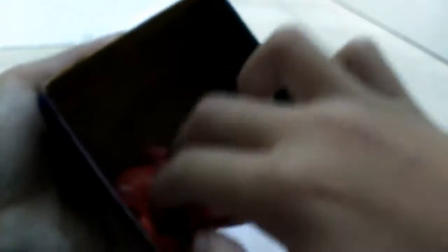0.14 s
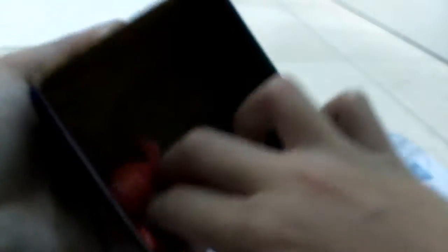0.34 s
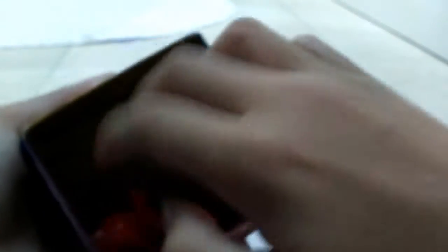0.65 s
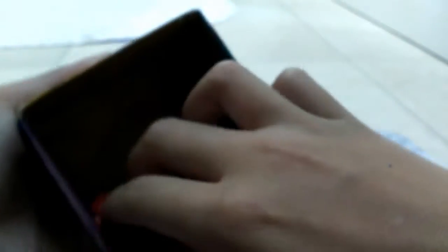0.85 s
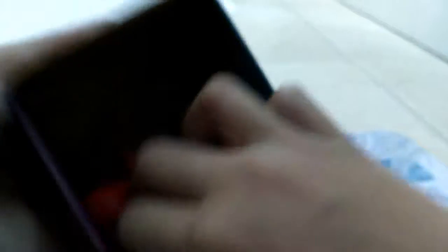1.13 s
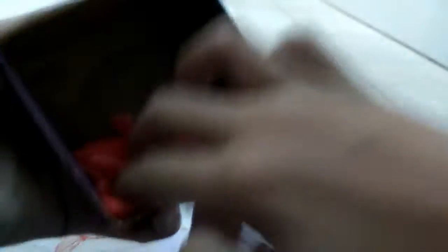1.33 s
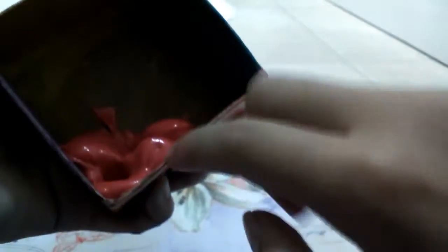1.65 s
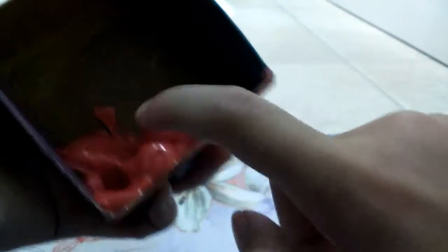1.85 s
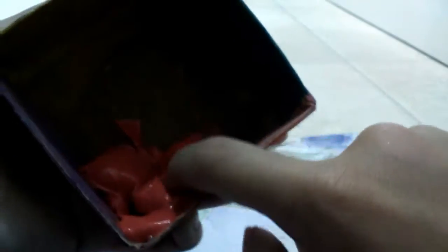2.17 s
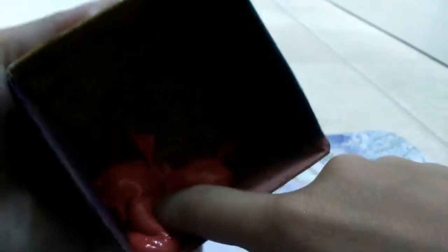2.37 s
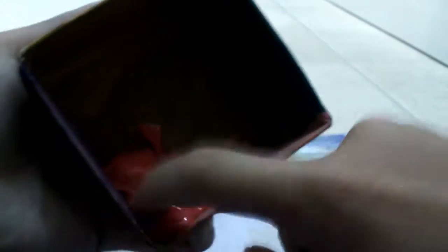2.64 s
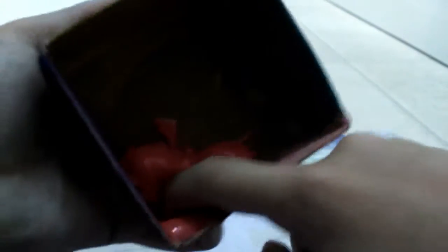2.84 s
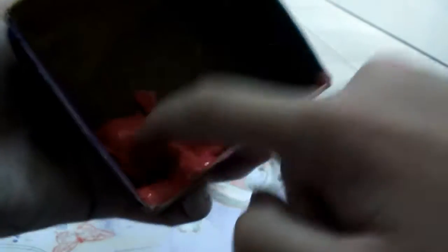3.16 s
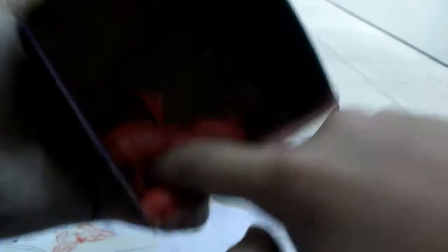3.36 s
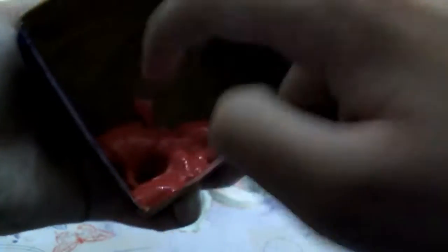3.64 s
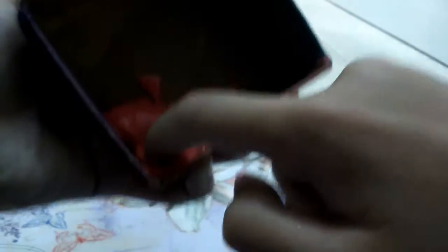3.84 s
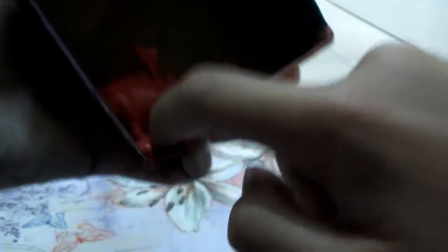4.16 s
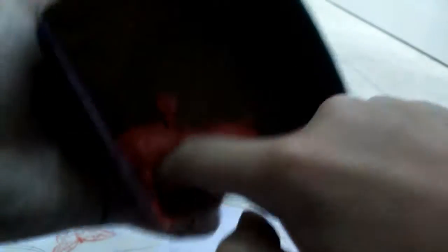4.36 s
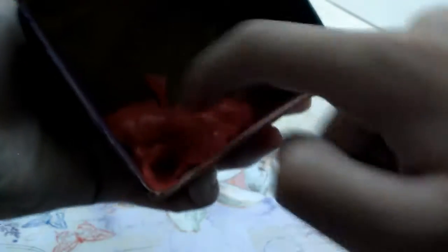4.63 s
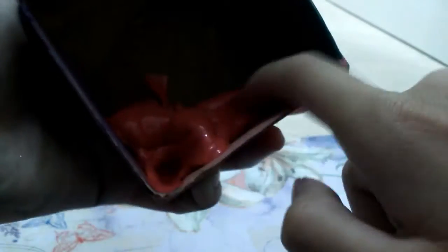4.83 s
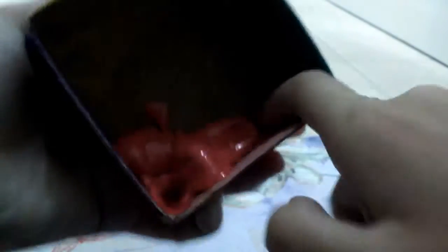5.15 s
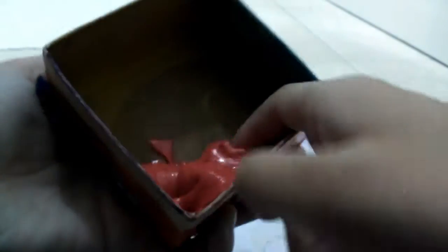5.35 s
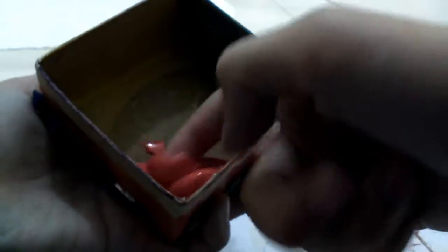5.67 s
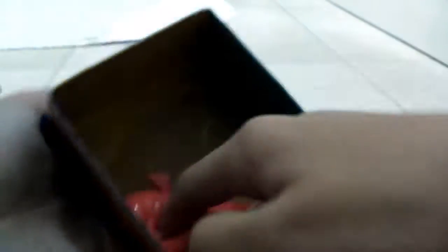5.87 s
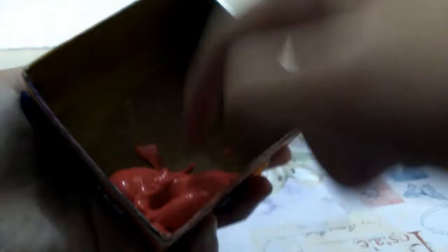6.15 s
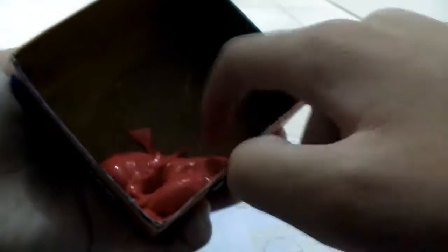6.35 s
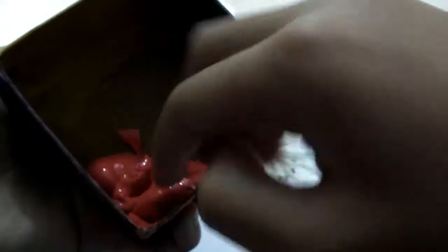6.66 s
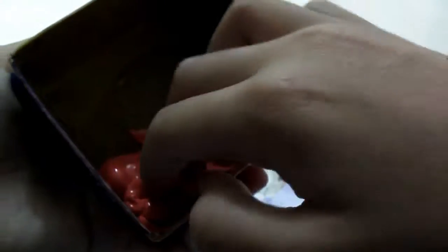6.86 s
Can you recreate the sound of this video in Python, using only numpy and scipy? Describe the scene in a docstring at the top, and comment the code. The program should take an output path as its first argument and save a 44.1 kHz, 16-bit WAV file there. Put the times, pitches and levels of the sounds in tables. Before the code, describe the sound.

Sticky slime is poked in a small hand-held box: brief boxy pops, tiny wet crackles and short skin squeaks at uneven intervals. One extremely loud, bright, dry snap occurs early, trailed by small even ticks. Soft thuds and low handling rumble come from the cardboard. The close microphone catches faint hiss and a short indoor reverberation; the later part is quieter until a final cluster of smacks.

```python
"""Fingers poke sticky slime in a small hand-held cardboard box, close to the microphone in a quiet room.
Air pockets pop and smack: torn-film noise and one click each ring a resonance coloured by the box.
Skin drags as random slips through gliding resonances; box bumps are decaying wall modes; dents rustle as noise.
One needle-sharp snap and then a run of small ticks are short rung impulses.
Noise gives a low handling rumble and a faint hiss; a decaying noise tail gives the room."""
import sys
import numpy as np
from scipy import signal
from scipy.fft import rfft
from scipy.io import wavfile

SR = 44100
rng = np.random.default_rng(int(sys.argv[2]) if len(sys.argv) > 2 else 0)


def persist_wave(psi):
    """Save psi, clipped to +-1, as 16-bit WAV."""
    counts = np.round(np.clip(psi, -1, 1) * 32767).astype(np.int16)
    wavfile.write(sys.argv[1], SR, np.atleast_2d(counts).T)


N = 308700  # samples, 7 s


def from_db(db):
    """Decibels to amplitude gain."""
    return 10 ** (np.asarray(db) / 20)


def rms_one(x):
    """Scale to rms 1."""
    return x / np.sqrt(np.mean(x ** 2) + 1e-20)


def add(track, start_s, sound):
    """Mix a sound into a track from start_s on."""
    start = max(0, round(start_s * SR))
    track[..., start:start + sound.shape[-1]] += sound[..., :N - start]


def lowpass(x, hz, order=2):
    """Butterworth low-pass."""
    return signal.sosfilt(signal.butter(order, min(hz, SR / 2 - 500), fs=SR, output="sos"), x)


def highpass(x, hz, order):
    """Butterworth high-pass."""
    return signal.sosfilt(signal.butter(order, hz, "high", fs=SR, output="sos"), x)


def resonance(x, hz, width_hz):
    """Two-pole resonance with gain 1 on top."""
    r = np.exp(-np.pi * width_hz / SR)
    zeros = np.array([1, 0, -1]) * (1 - r * r) / 2
    poles = [1, -2 * r * np.cos(2 * np.pi * hz / SR), r * r]
    return signal.lfilter(zeros, poles, x + 1e-18)


def peak_or_dip(x, hz, width_hz, level_db):
    """Bell filter: lifts or lowers a band by level_db at its centre."""
    half_width, lift = np.pi * width_hz / SR, from_db(level_db / 2)
    middle = -2 * np.cos(2 * np.pi * hz / SR)
    zeros = [1 + half_width * lift, middle, 1 - half_width * lift]
    poles = [1 + half_width / lift, middle, 1 - half_width / lift]
    return signal.lfilter(zeros, poles, x)


def coloured_noise(points):
    """Steady noise with the given spectrum, rms 1."""
    hz, level_db = np.transpose(points)
    bins_hz = np.fft.rfftfreq(N, 1 / SR) + 1  # +1 avoids log(0)
    gain = from_db(np.interp(np.log(bins_hz), np.log(hz), level_db))
    return rms_one(np.fft.irfft(rfft(rng.standard_normal(N)) * gain, N))


def drift(size, rate_hz):
    """Smooth random wavering, random knots of spread 1 joined by lines."""
    knots = np.arange(size) * rate_hz / SR
    return np.interp(knots, np.arange(4000), rng.standard_normal(4000))


def grains(size, per_s, spread_db):
    """Tiny releases: impulses at random moments with random sign and uneven strength, rms 1."""
    born = rng.random(size) < per_s / SR
    sign = rng.choice([-1, 1], size)
    strength = from_db(spread_db * np.minimum(rng.exponential(1, size), 4))
    return rms_one(born * sign * strength)


def chance_events(per_s, level_db, spread_db):
    """Faint events at random moments, level_db +/- spread_db: rows (time s, level dB)."""
    draws = rng.random((60, 2))
    times_s = np.cumsum(-np.log(1 - draws[:, 0])) / per_s
    levels_db = level_db + spread_db * (2 * draws[:, 1] - 1)
    return np.column_stack([times_s, levels_db])[times_s < N / SR]


def pocket(force, hz, width_hz):
    """Trapped air ringing around a pitch that may move; gain 1 on top."""
    turn = np.exp(2j * np.pi * np.cumsum(hz * np.ones(len(force))) / SR)
    return 2 * np.real(turn * lowpass(force / turn + 1e-18, width_hz / 2))


def pocket_width(hz, crack_db):
    """Small pockets and hard cracks ring more briefly: width of the resonance in Hz."""
    width_at_1khz_hz, pitch_power, doubling_db = 1634, 0.36, 23
    return width_at_1khz_hz * (hz / 1000) ** pitch_power * 2 ** (crack_db / doubling_db)


def in_box(x, hz, low_hz=400):
    """Small pockets reach higher into the treble. Gives (coloured by the open box, spilling into the room)."""
    # air in the open box, peaks and dips: (frequency [Hz], width [Hz], gain [dB])
    cavity = [(482, 120, 12.5), (600, 160, -12), (1009, 130, 10.5), (1477, 150, 11), (2144, 100, 5.5),
              (2522, 78.5, 6), (3471, 230, 9.5), (4492, 300, 11), (5360, 180, 4), (6350, 1100, 2.5)]
    top_at_1khz_hz, top_power = 6010, .16
    leak_at_1khz_db, leak_db_per_octave, spill_leak_db = -23, 6.5, -9.5
    khz = hz / 1000
    x = highpass(x, low_hz, order=2)
    body = lowpass(x, top_at_1khz_hz * khz ** top_power, order=8)
    leak = from_db(leak_at_1khz_db + leak_db_per_octave * np.log2(khz)) * x
    spill = body + from_db(spill_leak_db) * leak  # less of the highest treble reaches the room
    boxed = body + leak
    for mode_hz, width_hz, gain_db in cavity:
        boxed = peak_or_dip(boxed, mode_hz, width_hz, gain_db)
    return np.array([boxed, spill])


def background(lumps_db=3.5, handling_db=2, hiss_db=-75):
    """Uneven low rumble of the moving hands over a steady faint hiss."""
    # hands holding the box: (time [s], level before handling_db and lumps [dB])
    handling = [(0.0, -65.5), (0.35, -69.5), (0.7, -63), (0.97, -69), (1.75, -71.5), (3.84, -66.5),
                (4.5, -63), (5.01, -69.5), (5.899, -68), (6.41, -63), (6.65, -57.5), (7.0, -68.5)]
    # rumble spectrum: (frequency [Hz], relative level per Hz [dB])
    handling_colour = [(25, -6.5), (38, -7.5), (55, 4.5), (85, -4.5), (180, -10), (280, -12), (420, -20),
                       (600, -31)]
    # hiss spectrum: (frequency [Hz], relative level per Hz [dB])
    hiss_colour = [(400, 1), (590, -9.5), (800, 0.5), (1500, -7.5), (2700, -11.5), (5000, -16.5),
                   (8000, -15.5), (14000, -24), (16000, -36.5)]
    time_s, level_db = np.transpose(handling)
    effort_db = np.interp(np.arange(N) / SR, time_s, level_db) + lumps_db * drift(N, 22)
    rumble = from_db(effort_db + handling_db) * lowpass(coloured_noise(handling_colour), 900)
    return rumble + from_db(hiss_db) * coloured_noise(hiss_colour)


def pops(tear_db=-11, lead_share=0.79, room_db=-6.5):
    """A film of slime starts to tear, bursts with one click and tears on. Gives (direct, sent to the room)."""
    # air pockets opening: (burst time [s], level over 1 ms [dB], pocket pitch [Hz],
    # broad crack relative to pocket [dB], tearing time constant [s])
    pop_rows = [(.025, -42.5, 1650, -10, 0.004), (.040, -33, 1620, 7, 0.0051),
                (0.4628, -50.5, 1550, -1, 0.0022), (0.479, -44.5, 5450, -9, 0.0012),
                (.579, -51.5, 3600, -12, 0.0065), (.648, -53, 2480, -8, .005),
                (0.6925, -25, 5008, -10, 0.0017), (.694, -39, 1230, -17, 0.0038),
                (1.443, -35.5, 2120, -13, 0.0014), (1.4866, -30.5, 3500, 18.5, 0.0033),
                (1.694, -43, 1470, -21, 0.00074), (1.712, -22, 2450, -13, 0.00089),
                (1.7127, -31.5, 930, -22, 0.00085), (1.949, -53, 1494, -21, 0.0037),
                (2.605, -44, 5630, -13.5, 0.0063), (2.643, -54, 2660, -23, 0.003),
                (2.7893, -31, 2150, -11.5, 0.0011), (2.791, -35.5, 454, -11.5, 0.00074),
                (3.1207, -40, 5720, -15, 0.0021), (3.1748, -36.5, 1560, -6, 0.00012),
                (3.275, -53, 340, -29, 0.0024), (3.495, -47.5, 1398, -21, .001),
                (3.5, -35, 1580, -23, 0.00062), (3.678, -51, 3880, -1, 0.0029),
                (3.6952, -35.5, 942, -8.5, 0.001), (3.9403, -47.5, 1900, -17, 0.0011),
                (4.0987, -26, 2170, -13, 0.0007), (4.099, -29, 920, -19, 0.0011),
                (4.404, -43.5, 6000, -9.5, 0.0014), (4.423, -40.5, 6140, -11.5, 0.0018),
                (5.134, -58, 4500, -13, 0.0035), (5.9016, -42.5, 1500, -34, 0.0021),
                (6.128, -46, 4970, -12, 0.0028), (6.666, -30.5, 1420, -2.5, 0.0035),
                (6.694, -30.5, 1930, -15, 0.0036)]
    out, burst = np.zeros((2, N)), SR // 50
    t = (np.arange(SR // 15) - burst) / SR
    for time_s, level_db, hz, crack_db, tear_s in pop_rows:
        tearing = np.exp(-np.maximum(t, -t / lead_share) / tear_s)
        force = from_db(tear_db) * grains(len(t), per_s=14000, spread_db=-2.0) * tearing
        force[burst] += 1
        ringing = pocket(force, hz, pocket_width(hz, crack_db))
        pop = in_box(ringing + from_db(crack_db) * force, hz)
        rms_over_1ms = np.sqrt(np.sum(pop[0] ** 2) * 1000 / SR)
        add(out, time_s + t[0], from_db(level_db) * pop / rms_over_1ms)
    return out * [[1], [from_db(room_db)]]


def bumps(room_db=-6):
    """A soft push sets the walls flexing until the grip damps them. Gives (direct, sent to the room)."""
    # fingers bumping the box: (time [s], peak [dB], contact softness cut-off [Hz], grip damping time constant [s])
    bump_rows = [(0.053, -41.5, 397, 0.02), (1.4883, -38.5, 700, 0.056), (4.099, -26, 599, 0.26),
                 (5.178, -46.5, 377, 0.088), (5.304, -50, 400, .05), (5.625, -51.5, 400, .04),
                 (5.952, -49.5, 450.5, 0.035), (6.297, -51, 447.4, 0.033), (6.175, -45.5, 129, 0.041),
                 (6.632, -29, 404, 0.0038), (6.768, -43.5, 680, 0.016)]
    # wall flexing before contact and grip: (frequency [Hz], relative level [dB], t60 [s])
    walls = [(63.23, -18, 0.14), (113, -11.5, 0.17), (172.2, -8, 0.29), (242, -0.5, 0.06),
             (290, -3.5, 0.06), (402, -1, 0.033), (816, -4, 0.09), (960, 2.5, 0.0329)]
    nudge_soft_hz, nudge_still_s = 457, 0.04
    out, t = np.zeros(N), np.arange(SR // 2) / SR
    flex = sum(from_db(db - 60 * t / t60_s) * np.sin(2 * np.pi * hz * t) for hz, db, t60_s in walls)
    # the shifting grip nudges the box at random
    chances = chance_events(per_s=2.5, level_db=-56, spread_db=-1)
    nudges = [(time_s, peak_db, nudge_soft_hz, nudge_still_s) for time_s, peak_db in chances]
    for time_s, peak_db, soft_hz, still_s in bump_rows + nudges:
        thud = lowpass(flex * np.exp(-t / still_s), soft_hz)
        add(out, time_s, from_db(peak_db) * thud / np.abs(thud).max())
    return np.array([out, from_db(room_db) * out])


def drags(attack_s=0.0058, lumps_db=2.5, room_db=-7):
    """Skin slips about 1400 times a second, ringing a wet gap of changing size; the same slips give one pop's
    peel and after-ring. Gives (direct, sent to room)."""
    # skin on slime and wall: (time [s], length [s], level before pressure and fades [dB], swell over length [dB],
    # start pitch [Hz], end pitch [Hz], broad rasp relative to slips' unit rms [dB], fade time constant [s])
    drag_rows = [(1.09, 0.13, -67, -5, 2540, 2280, -21, 0.013),
                 (1.368, 0.081, -49, 14.5, 2380, 2110, -12, .003),
                 (1.701, 0.013, -40.5, 6.5, 1760, 2090, -9, 0.0028),
                 (1.708, .04, -47, -12, 3190, 3780, -17.5, 0.022),
                 (2.337, 0.05, -67, 13, 2470, 1734, -10, 0.037),
                 (2.551, .05, -66.5, 3, 1090, 1540, -22, 0.012),
                 (2.936, 0.024, -61, 4, 1400, 1290, -5.5, 0.028),
                 (3.109, 0.036, -60.5, -3, 4510, 4450, -10, 0.0095),
                 (4.44, 0.02, -62.5, 0, 4510, 4500, -12, 0.021),
                 (4.647, 0.014, -58.5, 7, 6480, 6260, -18.5, 0.016),
                 (4.671, 0.052, -55.5, 1, 2080, 2020, -16, 0.023),
                 (5.139, .09, -78, 3, 4400, 4500, -8.5, .03),
                 (5.284, 0.025, -72.5, 1, 4890, 5340, -11.5, 0.07),
                 (5.445, 0.058, -76, 4, 1790, 1900, -21, 0.055),
                 (6.099, 0.039, -65.5, 8.5, 1350, 1543, -13.5, 0.0087),
                 (6.646, 0.023, -50.5, 4, 6460, 6100, -10, .005),
                 (6.689, 0.072, -45.5, 0.5, 1910, 1640, -11, 0.0035),
                 (6.762, .051, -43, -1.5, 1660, 1850, -4.5, 0.0039)]
    # wet gap under a finger: (multiple of squelch pitch [ratio], level [dB])
    squelch_modes = [(.66, -7.5), (1, 1), (2.25, -16)]
    width_share = 0.34  # a squelch rings more narrowly than a pop
    out, t = np.zeros((2, N)), np.arange(SR // 3) / SR
    for time_s, length_s, level_db, swell_db, start_hz, end_hz, rasp_db, fade_s in drag_rows:
        progress = np.minimum(t / length_s, 1)
        pressure = from_db(swell_db * (progress - .5) + lumps_db * drift(len(t), 200))
        touching = (1 - np.exp(-t / attack_s)) * np.exp(-np.maximum(t - length_s, 0) / fade_s)
        glide_hz = start_hz * (end_hz / start_hz) ** progress
        hz = glide_hz * np.exp(.04 * drift(len(t), 90))
        slips = grains(len(t), per_s=1400, spread_db=2.0)
        width_hz = width_share * pocket_width(start_hz, rasp_db)
        ringing = sum(from_db(db) * pocket(slips, ratio * hz, width_hz) for ratio, db in squelch_modes)
        squelch = in_box(ringing + from_db(rasp_db) * slips, start_hz)
        add(out, time_s, from_db(level_db) * pressure * touching * squelch / squelch[0].std())
    return out * [[1], [from_db(room_db)]]


def ticks(room_db=-19, count=7):
    """Dry impulses ringing very briefly: one snap, then an even run. Gives (direct, sent to the room)."""
    # ring of a tick: (frequency [Hz], width [Hz], relative level [dB])
    tick_ring = [(2560, 3900, -14.5), (6200, 800, -2.5), (7640, 800, 2.5), (11657, 4200, -16.5),
                 (15500, 1100, -28.5)]
    snap_s, snap_peak_db = 1.2356, -0.4
    run_start_s, gap_s = 1.3003, .03364
    first_peak_db, settled_peak_db, settle_s = -27, -44, 0.0799
    out, click, tick = np.zeros(N), signal.unit_impulse(SR // 100), 0
    for k, (hz, width_hz, level_db) in enumerate(tick_ring):
        tick = tick + (-1) ** k * from_db(level_db) * resonance(click, hz, width_hz)
    since_s = gap_s * np.arange(count)
    run_db = settled_peak_db + (first_peak_db - settled_peak_db) * np.exp(-since_s / settle_s)
    for time_s, peak_db in [(snap_s, snap_peak_db), *zip(run_start_s + since_s, run_db)]:
        add(out, time_s, from_db(peak_db) * tick / np.abs(tick).max())
    return np.array([out, from_db(room_db) * out])


def dents(dull_hz=2200, top_hz=6400, room_db=-4):
    """Cardboard fibres rustle and settle after a hard poke. Gives (direct, sent to the room)."""
    # hard pokes denting the cardboard: (time [s], initial rms level [dB], settling time constant [s])
    dent_rows = [(3.696, -55, 0.027), (4.101, -47, .032)]
    out, t = np.zeros(N), np.arange(SR // 3) / SR
    for time_s, level_db, settle_s in dent_rows:
        dulled = lowpass(grains(len(t), per_s=9000, spread_db=1), dull_hz, order=1)
        fibres = rms_one(lowpass(dulled, top_hz, order=6))
        add(out, time_s, from_db(level_db) * fibres * np.exp(-t / settle_s))
    return np.array([out, from_db(room_db) * out])


def room(x, build_s=0.0016, late_db=-21, late_t60_s=0.81):
    """Diffuse reflections build up quickly and die band by band, over a faint longer tail."""
    # early tail: (frequency [Hz], t60 [s], relative level [dB])
    room_rows = [(151, 0.28, 3), (398.9, 0.28, -1), (990, .38, -2.5), (2200, 0.29, -4), (4800, 0.17, 6),
                 (6996, 0.14, -3), (13724, 0.1995, 1.5)]
    t = np.arange(SR) / SR
    hz, t60_s, level_db = np.transpose(room_rows)
    edges_hz, tail = np.geomspace(50, 18000, 13), 0
    late = from_db(late_db) * np.exp(-np.log(1000) * t / late_t60_s)
    for low_hz, high_hz in zip(edges_hz, edges_hz[1:]):
        band_filter = signal.butter(2, [low_hz, high_hz], "band", fs=SR, output="sos")
        band = signal.sosfilt(band_filter, rng.standard_normal(SR))
        log_centre = np.log(low_hz * high_hz) / 2
        early = np.exp(-np.log(1000) * t / np.interp(log_centre, np.log(hz), t60_s))
        gain = from_db(np.interp(log_centre, np.log(hz), level_db))
        tail = tail + band * gain * np.hypot(early, late)
    tail = tail * (1 - np.exp(-(t / build_s) ** 2))
    return signal.fftconvolve(x, tail / np.sqrt(np.sum(tail ** 2)))[:N]


def scene():
    """Everything in the box, its reflections and the background."""
    direct, sent = pops() + drags() + dents() + bumps() + ticks()
    return (direct + room(sent) + background())[None]


def record(dry, low_cut_hz=38, top_cut_hz=16400, overload=.82):
    """The deepest bass is lost, peaks past the overload level are clipped flat; the top is cut steeply."""
    x = np.clip(highpass(dry, low_cut_hz, order=3), -overload, overload)
    return signal.sosfilt(signal.ellip(10, .1, 80, top_cut_hz, fs=SR, output="sos"), x)


dry = scene()
out = record(dry)
persist_wave(out)
```